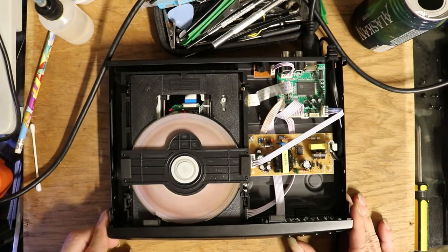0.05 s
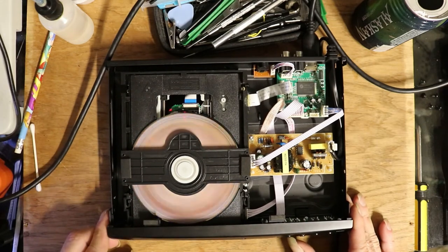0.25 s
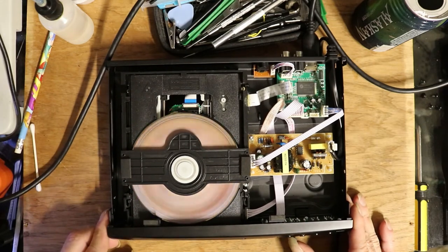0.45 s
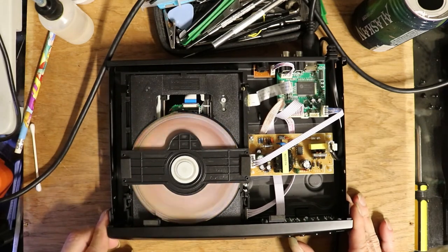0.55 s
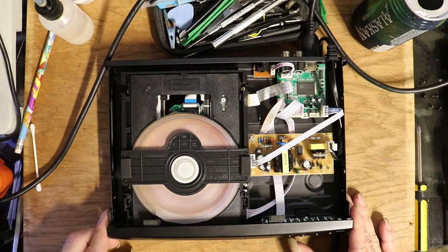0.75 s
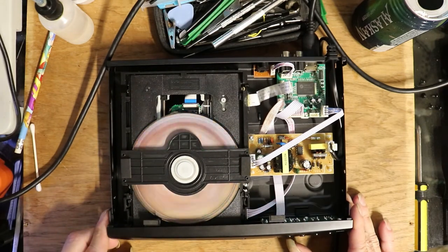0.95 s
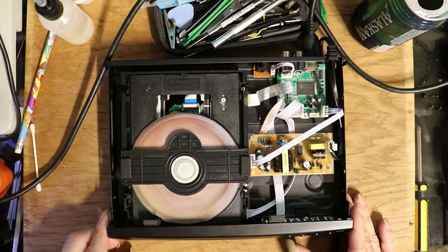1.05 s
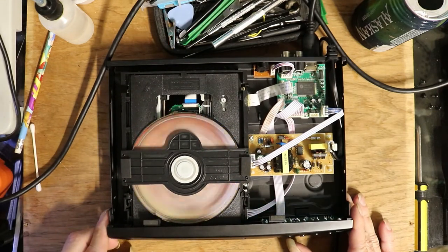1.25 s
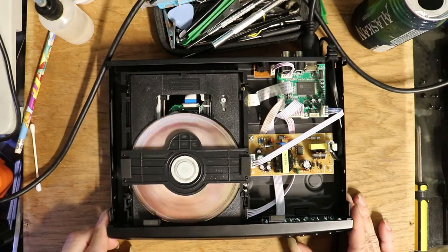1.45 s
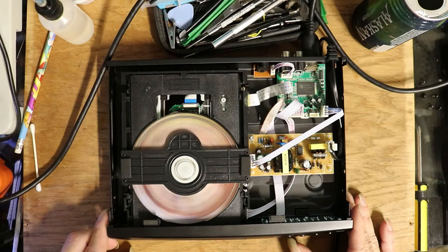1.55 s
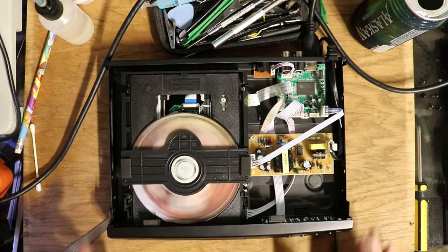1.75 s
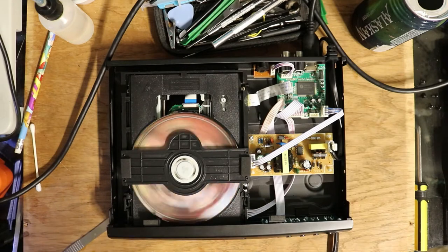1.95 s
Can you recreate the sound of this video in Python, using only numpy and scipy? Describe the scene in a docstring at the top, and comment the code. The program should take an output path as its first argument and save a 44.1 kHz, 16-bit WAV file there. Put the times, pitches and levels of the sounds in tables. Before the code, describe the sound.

An open disc player's mechanism gives a sharp plastic snap, then a duller clack. Its spinning disc whirs faintly throughout with short spells of buzzing, and a hand lightly brushes the case near the end, close by in a small room.

```python
"""A wooden workbench in a small room: an open disc player runs, held in two hands.
A small gear rasps, one scrape per turn. The mechanism snaps, then clacks, duller; each click is a
plastic crack plus ringing case modes, and the room answers. The disc whirs and rattles throughout;
after the clack the drive buzzes in spells. A hand ticks on the case, brushes off it and bumps it."""
import sys
import numpy as np
from scipy import signal
from scipy.fft import rfft, irfft
from scipy.io import wavfile
from scipy.ndimage import uniform_filter1d

SR = 44100
rng = np.random.default_rng(int(sys.argv[2]) if len(sys.argv) > 2 else 0)


def materialize(psi):
    """Save the field psi as 16-bit PCM at rate SR to the path in sys.argv[1].

    A 1-D psi becomes a single channel; in a 2-D psi each row is a channel.
    """
    bounded = np.clip(np.atleast_2d(psi).T, -1, 1)
    quanta = np.round(bounded * 32767).astype(np.int16)
    wavfile.write(sys.argv[1], SR, quanta)


N = 88200
T = np.arange(N) / SR
HZ = np.fft.rfftfreq(N, 1 / SR)

# Room decay. Each row: frequency in Hz, T60 in seconds.
ROOM_T60_S = [(200, 0.05), (1200, 0.4024), (3000, 0.3478), (8000, 0.32), (15000, 0.0068)]
# Spectra. Each row: frequency in Hz, relative density in dB.
ROOM_SPECTRUM_DB = [(200, -5.5), (1200, 8), (3000, 6), (6000, 1), (9000, 4), (15000, 2)]
AIR_SPECTRUM_DB = [(12, -53), (24, -10), (38, -11), (55, 6.5), (80, -0.5), (102, -4.5), (150, -1),
                   (200, -2.5), (250, -3), (410, -5.5), (500, -6.5), (780, -13.5), (930, -9), (1120, -14.5),
                   (1330, -10), (1530, -17), (1710, -12.5), (2100, -13), (2650, -25), (4200, -28),
                   (5100, -29), (7000, -26.5), (9300, -25.5), (12000, -29.5), (16000, -36)]
RATTLE_SPECTRUM_DB = [(1500, -12), (2800, 0), (3600, -8.5), (4300, -2), (5000, -17), (8000, -24),
                      (16000, -55)]
BUZZ_SPECTRUM_DB = [(1000, -37.5), (1650, -39), (1900, 2.5), (2030, -12), (2100, 7), (2160, 7),
                    (2230, -50.5), (2700, -16), (4400, -20.5), (5200, -54), (9000, -53)]
GEAR_SPECTRUM_DB = [(1500, 0.5), (2900, -8), (4500, -6.5), (5200, -13.5), (6200, -4), (7200, -6),
                    (9500, -8), (11300, -17), (13000, -10), (15500, -21)]
BRUSH_SPECTRUM_DB = [(500, -3), (2500, 1.5), (3800, -0.5), (5200, -2.5), (7000, 1), (8600, 2),
                     (11000, -3.5), (13500, -10), (16000, -12.5)]
SNAP_SPECTRUM_DB = [(120, -47), (200, -21.5), (722, -25.5), (1350, -3.5), (1680, -10.5), (2210, -2.5),
                    (2610, -8.5), (2960, -2.5), (4120, -16.5), (5130, -15.5), (6520, -20), (7270, -12.5),
                    (10500, -14.5), (13800, -19.5), (16000, -33)]
CLACK_SPECTRUM_DB = [(120, -63.5), (200, -39), (410, -24), (800, -21), (1000, -7), (1370, -2), (1600, -9),
                     (2000, -17), (2250, -7), (2750, -15), (3020, -10.5), (3500, -24), (5100, -30),
                     (8300, -25), (11000, -33.5), (16000, -45.5)]
# Stereo image. Each row: frequency in Hz, left-right correlation.
DIFFUSE_CORRELATION = [(30, 0.975), (125, 0.901), (250, 0.83), (400, 0.68), (1000, 0.521), (2400, 0.172),
                       (4400, 0.205), (7000, 0.335), (7900, 1), (11000, 0.9954)]
CRACK_CORRELATION = [(200, 1), (1000, 0.935), (3300, 0.778), (4500, -0.034), (8000, 0.65), (11500, 0.98),
                     (16000, .99)]
# Crack balance. Each row: frequency in Hz, left over right in dB.
CRACK_PAN_DB = [(200, -2), (900, 3.5), (2000, -2.5), (3000, -1.5), (5000, -2), (8500, -5.5), (11000, 1.14),
                (16000, -1.77)]
# Spindle tones and mains hum. Each row: frequency in Hz, level in dB, rms wander in Hz.
MOTOR_TONES = [(58.9, -69.5, 0.47), (118.43, -58, 1.983), (146.43, -65, 3.07), (243.2, -58, 1.807),
               (285.2, -65.5, 2.2), (356.85, -65, 3.77), (497.14, -65, 1.714), (1203.8, -57.5, 1.293),
               (1172.2, -70, 2.66), (1509.3, -70.5, 4.01), (1514.5, -63, 3.27)]
# Resonances. Each row: centre in Hz, level in dB, width in Hz.
DRIVE_RESONANCES = [(939.5, -64.5, 24), (1178.9, -59.5, 61.4), (1559.2, -59.5, 30.8)]
GEAR_RESONANCES = [(7050, -62.5, 260), (8350, -66.5, 150), (9720, -70, 130), (11900, -72, 200),
                   (12450, -66.5, 170)]
# Drive buzz. Each row: start in seconds, end in seconds, level in dB.
BUZZ_SPELLS = [(0.481, 0.578, -55.5), (0.61, 0.831, -54), (0.859, 1.064, -54.5), (1.128, 1.272, -55.5),
               (1.326, 1.465, -58), (1.532, 1.595, -58.5), (1.71, 1.818, -60), (1.929, 1.972, -62.5)]
# Skin brushing the case. Each row: time in seconds, level in dB.
BRUSH_ENVELOPE_DB = [(1.58, -62.5), (1.63, -62.5), (1.68, -56.5), (1.745, -53), (1.81, -56), (1.86, -65.5),
                     (1.95, -79.5)]
# Hand ticks. Each row: start in seconds, crack energy in dB, T60 in seconds, band centre in Hz,
# spread in octaves, ring gain in dB.
HAND_TICKS = [(0.1718, -22.5, 0.0127, 2540, 0.54, -64), (1.370, -23.5, 0.0236, 3530, 0.846, -52),
              (1.615, -21.5, 0.036, 5490, 0.91, -40), (1.688, -26, 0.038, 900, 1.18, -63),
              (1.95, -43, .04, 4000, 1.15, -60)]
# Modes of case and mechanism. Each row: frequency in Hz, T60 in seconds, relative snap level in dB,
# relative clack level in dB, left over right in dB.
CASE_MODES = [(422.5, 0.0866, -24.5, -18, 0), (542.2, 0.17, -34, -29.5, -0.5),
              (1037.4, 0.0357, -11, -33, -8), (1246.2, 0.0416, -22, 2, -4.5), (1316, 0.0897, -40, -9, -6),
              (1432.4, 0.0535, -7, -19.5, 6.5), (2117, 0.039, -16.5, -12.5, -16),
              (2550, 0.103, -25.5, -18.5, 2.5), (2920, 0.034, 0, -26, 6.5), (3016, 0.0077, -1.5, -20.5, 4),
              (3543, 0.067, -21.5, -34, -31), (5170, 0.0323, -12.5, -34.5, -6),
              (7530, 0.043, -10.5, -42.5, -2), (10480, 0.0111, 1.5, -29.5, 4),
              (11500, 0.0108, 3, -30.5, -1.5), (13197, 0.015, -10.5, -32, 2.5)]
# Snap, then clack. Each row: start in seconds, crack energy in dB, T60 in seconds, ring gain in dB,
# ring rise in seconds, room send energy in dB, send evenness (0.5 is flat).
MECHANISM_CLICKS = [(0.1935, 11, 0.01165, -14, 0.0005047, -6, 0.47),
                    (0.4325, 8, 0.0367, -13, 0.002195, -12.5, 0.14)]


def amp(db):
    """Decibels to gain."""
    return 10 ** (np.asarray(db) / 20)


def unit(x):
    """Scale to unit rms."""
    return x / np.sqrt(np.mean(x ** 2) + 1e-20)


def curve(points, hz=HZ):
    """Interpolate a table over log frequency."""
    knots_hz, values = np.transpose(points)
    return np.interp(np.log(hz + 1), np.log(knots_hz + 1), values)


def pan(db):
    """Stereo gains for a left-over-right level."""
    return amp(np.array([[.5], [-.5]]) * db)


def correlate(spectra, correlation):
    """Mix two independent spectra to a given left-right correlation."""
    c = np.clip(curve(correlation), -1, 1)
    mid, side = spectra[0] * np.sqrt((1 + c) / 2), spectra[1] * np.sqrt((1 - c) / 2)
    return np.array([mid + side, mid - side])


def noise(gain):
    """Shaped stereo noise, unit rms."""
    white = rfft(rng.standard_normal((2, N)))
    return unit(irfft(correlate(white, DIFFUSE_CORRELATION) * gain, N))


def resonances(rows):
    """Narrow noise bands, heard as wavering tones."""
    return sum(amp(db) * noise(1 / (1 + ((HZ - hz) / width_hz * 2) ** 2)) for hz, db, width_hz in rows)


def drift(rate_hz=6):
    """Slow random wander, unit rms."""
    return unit(irfft(rfft(rng.standard_normal(N)) / (1 + (HZ / rate_hz) ** 4), N))


def tone(hz, wander_hz):
    """Sine of wandering pitch, unit rms."""
    cycles = np.cumsum(hz + wander_hz * drift()) / SR + rng.random()
    return np.sqrt(2) * np.sin(2 * np.pi * cycles)


def minimum_phase(gain):
    """Causal frequency response with this magnitude."""
    log_gain = np.log(np.r_[gain, gain[-2:0:-1]] + 1e-5)
    return np.exp(np.conj(signal.hilbert(log_gain)))[:len(HZ)]


def room(x, rise_s=0.0092):
    """Diffuse small-room tail; each band decays at its own rate."""
    hz, age_s, bands = signal.stft(rng.standard_normal((2, N)), SR, nperseg=256)
    bands *= amp(curve(ROOM_SPECTRUM_DB, hz)[:, None] - 60 * age_s / curve(ROOM_T60_S, hz)[:, None])
    tail = signal.istft(bands, SR, nperseg=256)[1][:, :N]
    tail = irfft(correlate(rfft(tail), DIFFUSE_CORRELATION), N) * np.minimum(T / rise_s, 1)
    return signal.fftconvolve(x, tail[:, :N // 2] / np.linalg.norm(tail[0]), axes=1)[:, :N]


def spindle(air_db=-48.5, pan_db=-2):
    """Air noise of the disc, motor tones and hum, and drive resonances fed by the spin."""
    air = amp(air_db) * noise(amp(curve(AIR_SPECTRUM_DB)))
    tones = sum(amp(db) * tone(hz, wander_hz) * pan(pan_db * (hz > 1000))
                for hz, db, wander_hz in MOTOR_TONES)
    return air + tones + pan(pan_db) * resonances(DRIVE_RESONANCES)


def disc_rattle(level_db=-65.5, rate_hz=75.99, wander_hz=2, spread_db=2.5, t60_s=0.033, pan_db=-2):
    """The spinning disc makes tiny, near-regular ticks of uneven strength."""
    cycles = np.cumsum(rate_hz + wander_hz * drift()) / SR
    tick_index = cycles.astype(int)
    age_s = (cycles - tick_index) / rate_hz
    strength = amp(spread_db * rng.standard_normal(N))[tick_index]
    ticks = strength * amp(-60 * age_s / t60_s) * noise(amp(curve(RATTLE_SPECTRUM_DB)))
    return amp(level_db) * pan(pan_db) * unit(ticks)


def drive_buzz(flutter_hz=16, depth=0.133, edge_s=0.009, pan_db=-2):
    """Short spells of buzz, fluttering as the disc turns."""
    spells = sum(amp(db) * np.clip(np.minimum(T - start_s, end_s - T) / edge_s, 0, 1)
                 for start_s, end_s, db in BUZZ_SPELLS)
    flutter = 1 + depth * np.sin(2 * np.pi * flutter_hz * T)
    return pan(pan_db) * spells * flutter * noise(amp(curve(BUZZ_SPECTRUM_DB)))


def gear_rasp(rub_db=-50.5, turn_hz=58.3, teeth=9, scrape_s=0.00275, end_s=0.4208, fade_s=0.074):
    """A small gear scrapes once per turn and its teeth flutter; it fades just before the clack."""
    rub = amp(rub_db) * noise(amp(curve(GEAR_SPECTRUM_DB))) + resonances(GEAR_RESONANCES)
    turn = (T - 0.0035) * turn_hz % 1
    scrape = 1 + 1.49 * np.exp(-turn / turn_hz / scrape_s)
    mesh = 1 + 0.17 * np.cos(2 * np.pi * teeth * turn)
    return rub * unit(scrape * mesh) * np.clip((end_s - T) / fade_s, 0, 1)


def plastic_crack(start_s, t60_s, gain, rise_s=0.0000854, hold_s=0.00066):
    """Dense, fast-decaying plastic vibration, unit energy."""
    age_s = np.maximum(T - start_s, 0)
    attack = np.minimum(age_s / rise_s, 1)
    decay = amp(-60 * np.maximum(age_s - hold_s, 0) / t60_s)
    spectra = rfft(rng.standard_normal((2, N)) * attack * decay)
    spectra /= np.sqrt(uniform_filter1d(abs(spectra) ** 2, size=900, axis=1))  # whiten
    response = minimum_phase(gain) * pan(curve(CRACK_PAN_DB))
    burst = irfft(correlate(spectra, CRACK_CORRELATION) * response, N)
    return unit(burst * attack) / np.sqrt(N)


def case_ring(start_s, rise_s, strike):
    """Damped case modes; strike 0 takes the snap levels, 1 the clack levels."""
    age_s = np.maximum(T - start_s, 0)
    modes = np.zeros((2, N))
    for hz, t60_s, *strike_db, pan_db in CASE_MODES:
        decay = amp(strike_db[strike] - 60 * age_s / t60_s)
        modes += pan(pan_db) * decay * np.sin(2 * np.pi * hz * (age_s - rise_s / 2))
    return modes * np.minimum(age_s / rise_s, 1)


def hand_brush():
    """Skin slides off the case: a swell of hiss."""
    level_db = np.interp(T, *np.transpose(BRUSH_ENVELOPE_DB), left=-120)
    return amp(level_db) * noise(amp(curve(BRUSH_SPECTRUM_DB)))


def hand_bump(start_s=1.689, hz=135.6, level_db=-33.5, t60_s=0.038):
    """A soft bump on the case: one low damped sine."""
    age_s = np.maximum(T - start_s, 0)
    return amp(level_db - 60 * age_s / t60_s) * np.sin(2 * np.pi * hz * age_s)


def hand_ticks(room_db=-10):
    """Light ticks on the case: band-limited cracks, faint ring, room tail."""
    ticks = np.zeros((2, N))
    for start_s, crack_db, t60_s, centre_hz, spread_oct, ring_db in HAND_TICKS:
        band = np.exp(-.5 * (np.log2((HZ + 1) / centre_hz) / spread_oct) ** 2)
        ticks += amp(crack_db) * plastic_crack(start_s, t60_s, amp(curve(SNAP_SPECTRUM_DB)) * band)
        ticks += amp(ring_db) * case_ring(start_s, rise_s=0.002737, strike=1)
    return ticks + amp(room_db) * room(ticks)


def mechanism_clicks():
    """Snap and clack crack and ring the case; the room hears all sides, so its feed is flatter."""
    direct, send = np.zeros((2, 2, N))
    for strike, click in enumerate(MECHANISM_CLICKS):
        start_s, crack_db, t60_s, ring_db, rise_s, send_db, evenness = click
        spectrum_db = curve((SNAP_SPECTRUM_DB, CLACK_SPECTRUM_DB)[strike])
        direct += amp(ring_db) * case_ring(start_s, rise_s, strike)
        direct += amp(crack_db) * plastic_crack(start_s, t60_s, amp(spectrum_db))
        send += amp(send_db) * plastic_crack(start_s, t60_s, amp(spectrum_db * (0.5 - evenness)))
    return direct + room(send)


def scene():
    """Stereo sum of player and hands."""
    contacts = mechanism_clicks() + hand_ticks() + hand_brush() + hand_bump()
    return contacts + spindle() + disc_rattle() + drive_buzz() + gear_rasp()


def record(dry):
    """Clip at full scale, then low-pass at 15.9 kHz."""
    lowpass = signal.firwin(511, 15900, window=("kaiser", 9), fs=SR)
    return signal.oaconvolve(np.clip(dry, -1, 1), lowpass[None], "same")


dry = scene()
out = record(dry)
materialize(out)
```